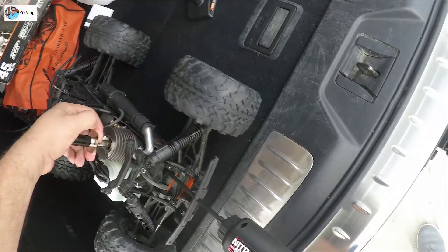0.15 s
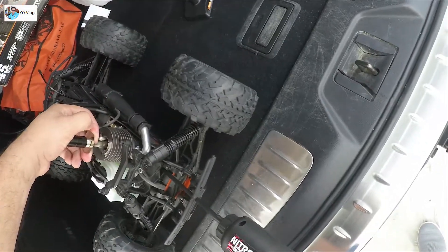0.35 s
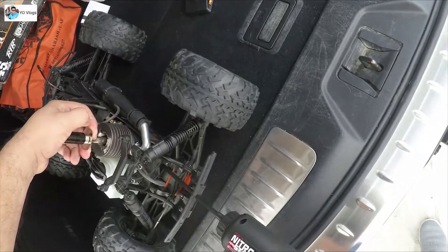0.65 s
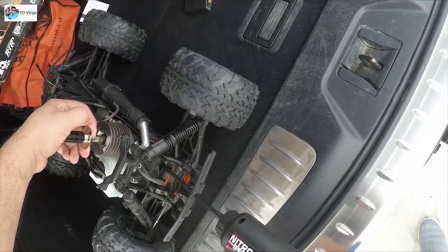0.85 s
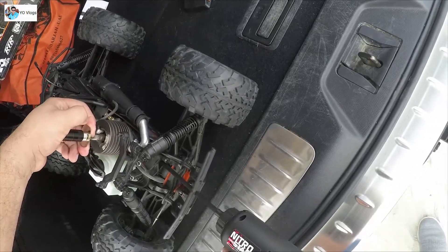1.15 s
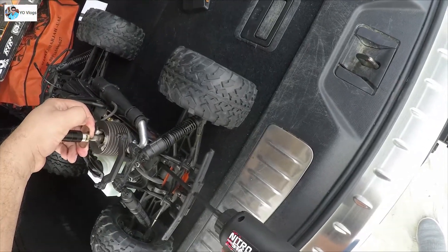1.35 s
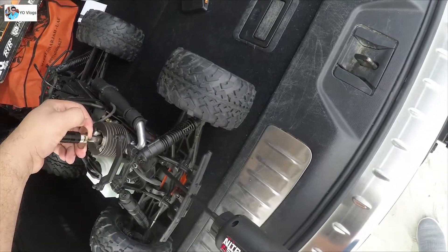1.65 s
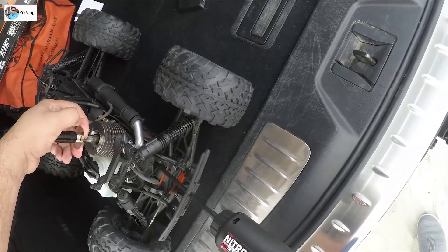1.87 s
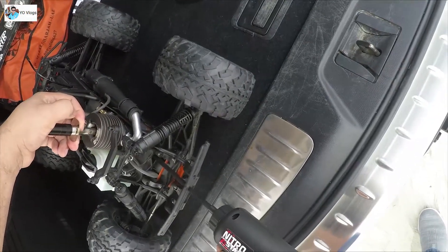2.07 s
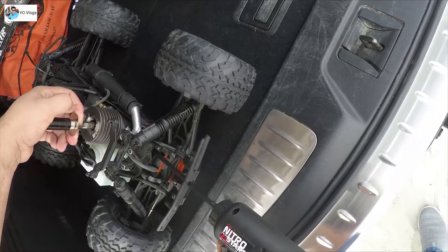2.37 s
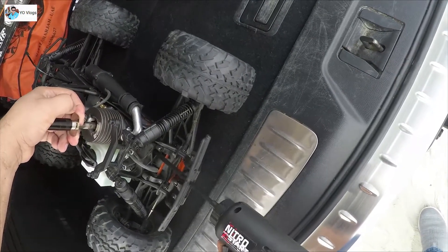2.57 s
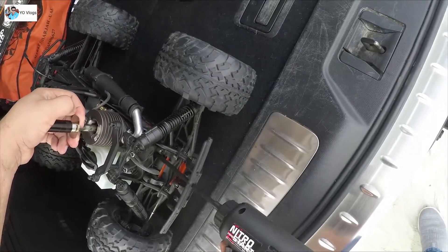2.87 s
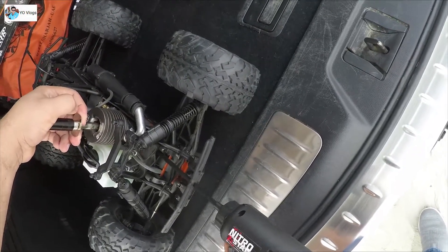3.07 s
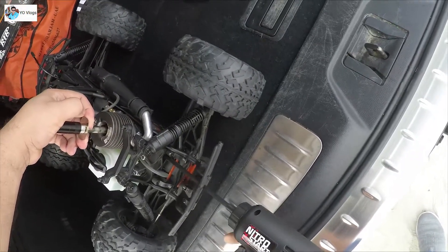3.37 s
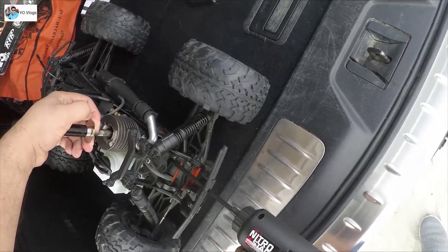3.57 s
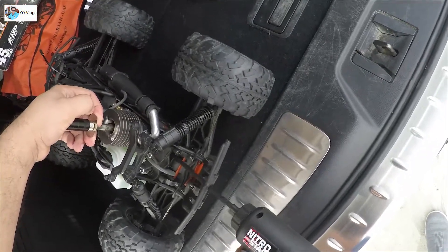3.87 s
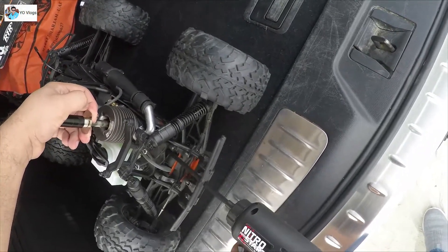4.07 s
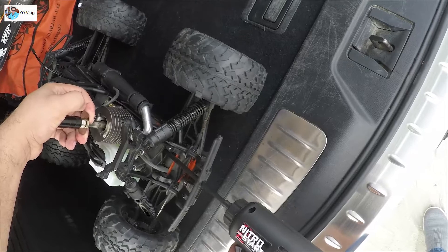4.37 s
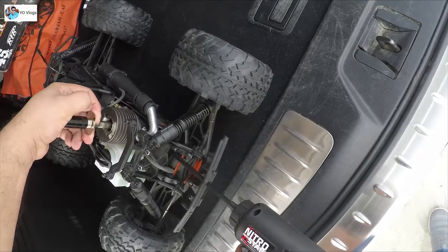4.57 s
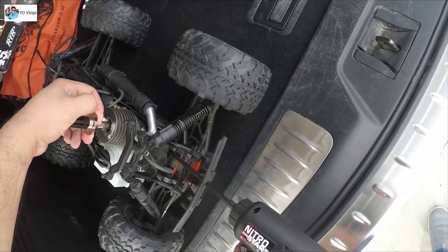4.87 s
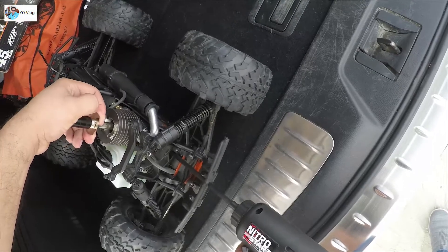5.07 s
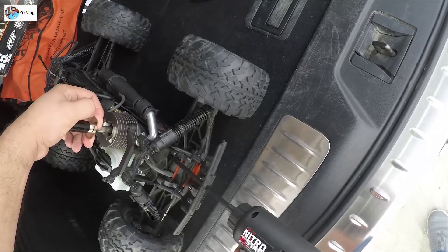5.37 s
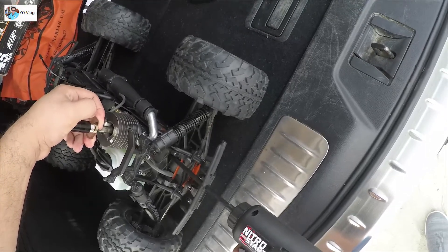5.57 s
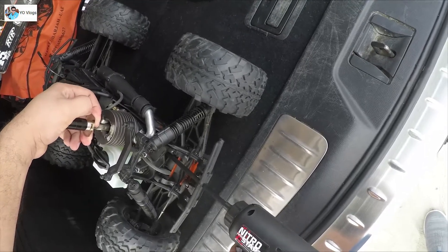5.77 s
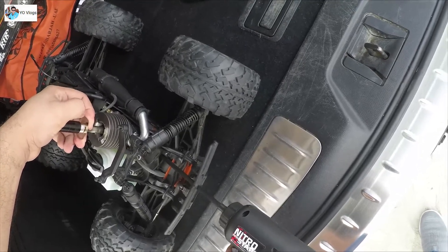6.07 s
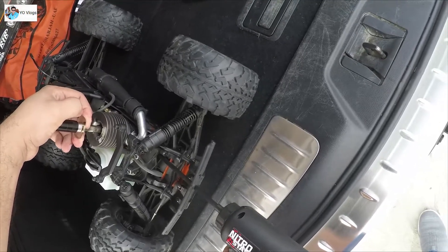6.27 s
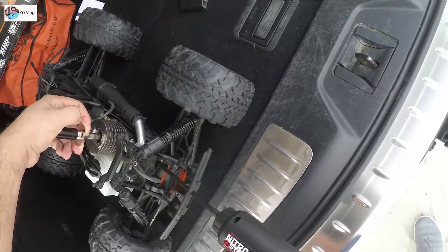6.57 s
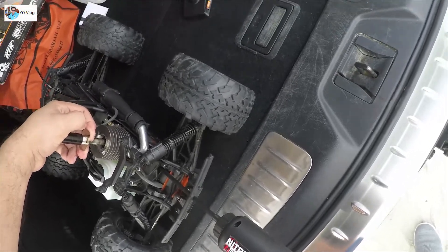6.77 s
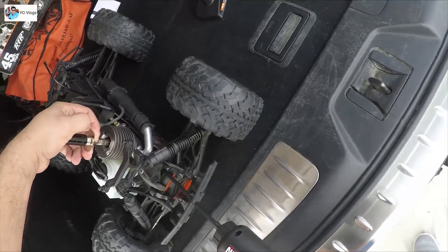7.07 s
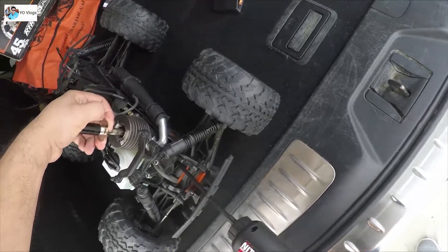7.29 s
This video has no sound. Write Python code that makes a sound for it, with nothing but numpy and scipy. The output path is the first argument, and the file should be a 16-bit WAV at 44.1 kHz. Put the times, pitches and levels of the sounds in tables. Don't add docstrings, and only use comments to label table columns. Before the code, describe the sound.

A hand-held electric starter cranks a small glow engine on a car boot floor, outdoors, heard very close. At 0 s a harsh clutch rasp bursts over gritty gear whir; weak barks follow, and from 0.33 to 0.5 s the engine sputters in a rapid ragged flutter, then dies with a hard metallic kick. From 0.8 to 3.3 s it labours unevenly: rasping skids, dull hollow pops, sharp clacks and occasional barks with rattling metal, roughly two lurches a second, quickening at times. The starter stops around 3.5 s, leaving light wind, faint ringing metal and a tiny bird chirp. At 3.75 s the whir jumps back, and until 5.3 s pop-clack pairs beat evenly, over six a second. From 5.4 s the clutch skids again about every quarter to half second, with a strong bark at 5.7 s. A short sputter and clank come at 7.2 s, then whir and a last pop near 7.4 s.

```python
import sys
import numpy as np
from scipy import signal
from scipy.fft import rfft, irfft, next_fast_len
from scipy.io import wavfile
from scipy.ndimage import uniform_filter1d

SR = 44100
rng = np.random.default_rng(int(sys.argv[2]) if len(sys.argv) > 2 else 0)


def pcm_store(signal):
    levels = np.round(np.clip(np.atleast_2d(signal), -1, 1) * 32767)
    wavfile.write(sys.argv[1], SR, levels.astype(np.int16).T)


def volts_from_db(level):
    exponent = np.asarray(level, float) / 20
    return 10 ** exponent


N = 327663

# pop_crest_s, clack_s, clack_db, groan_db, loudest_ring_hz
FREE_TURNS = [(3.8546, 3.8937, -10, -31, 4870), (4.0192, 4.054, -7.5, -27, 4870),
              (4.1766, 4.211, -7, -26.5, 4790), (4.3313, 4.366, -7, -31, 5020),
              (4.486, 4.52, -6, -31.5, 1664), (4.6404, 4.6748, -7.5, -29, 1680),
              (4.7957, 4.8308, -7, -29, 5330), (4.95, 4.9852, -6, -35, 5060),
              (5.1063, 5.1391, -6.5, -32, 1586), (5.2623, 5.295, -7, -29, 4950)]
# pop_crest_s, pop_db, clack_s, clack_db, loudest_ring_hz
LABOURED_TURNS = [(0.9445, -28, .9951, -16, 8350), (1.3746, -27, 1.423, -14, 4830),
                  (1.8139, -26, 1.8572, -12.5, 2130), (2.2399, -26, 2.2884, -12, 8160),
                  (2.496, -26.5, 2.55, -33, 5040), (2.9184, -26, 2.9649, -10.5, 8400),
                  (3.176, -25.5, 3.2443, -21, 8670), (5.5125, -25, 5.5555, -12, 7750),
                  (5.9393, -25, 5.9812, -13.5, 2390), (6.2035, -25, 6.2469, -12, 2100),
                  (6.4672, -25.5, 6.5057, -14, 1670), (6.7306, -24.5, 6.7672, -15, 3000),
                  (6.9954, -27, 7.016, -41.5, 4980), (7.3822, -28, 7.4121, -15, 1820)]
# bark_s, bark_db, pop_crest_lag_s, pop_db, groan_db
FIRED_TURNS = [(0.1364, -23, 0.0028, -28, -46), (0.3306, -17, 0.0026, -36, -40),
               (0.667, -21, 0.004, -30.5, -45), (1.1066, -13.5, 0.0026, -27, -41),
               (1.5362, -13.5, 0.0041, -25.5, -36), (1.972, -17, 0.004, -22, -30.5),
               (2.6554, -29.5, 0.003, -23.5, -33.5), (5.67, -11.5, 0.0034, -23.5, -38),
               (7.158, -16, 0.0022, -28, -32)]
# first_lag_s, first_db, second_lag_s, second_db
PIPE_RETURNS = [(0.011, -21, .020, -25), (0.027, -32, .03, -28.5), (0.0112, -29, .026, -26.5),
                (0.0095, -21.5, 0.023, -22.5), (.011, -20, .026, -20.5), (.0135, -23.5, 0.023, -22),
                (.015, -22.5, 0.023, -32.5), (.0105, -25, 0.0083, -17.5), (.0095, -20.5, .018, -22)]
# bark_s, peak_db
SPUTTERS = [(0.1473, -15.5), (0.3413, -17), (0.351, -11), (0.3687, -10.5), (0.395, -9.5), (0.4184, -14),
            (0.4373, -13), (0.4564, -11.5), (0.4845, -11.5), (0.5150, -17), (7.1706, -8), (7.1911, -10),
            (7.2125, -17)]
# time_s, level_db
BURNS = [
    [(.330, -25), (.40, -23.5), (.495, -23.5), (.515, -30)],
    [(7.159, -24), (7.2, -23), (7.235, -29)],
]
# freq_hz, density_db
BURN_TONE = [(120, -31.5), (220, -9.5), (270, -13.5), (340, -5), (470, -20), (610, -16.5), (870, -13.5),
             (1170, -24), (1400, -13.5), (1800, -15), (2600, -14.5), (5000, -23), (8500, -17.5),
             (13500, -28), (15200, -48)]
# freq_hz, level_db, t60_s
PIPE_MODES = [(339, -8.5, 0.07), (650, -9.5, 0.15), (1170, 13, 0.092), (1790, 7, 0.11)]
# freq_hz, level_db, t60_s
MUFFLER_MODES = [(163, -20, 0.15), (222, -0.5, 0.082), (238, -17, 0.048), (351, -6, 0.087),
                 (396, -10.5, 0.076), (612, -17.5, 0.2)]
# freq_hz, level_db, t60_s
SHELL_MODES = [(584, -3.5, 0.11), (629.7, 3, 0.085), (772, 1.5, 0.054)]
# freq_hz, level_db, t60_s
BARK_MODES = [(1180, 2, .04), (1800, 6, .03), (1450, 0, .03)]

# start_s, peak_db, length_s, groan_before_db
SLIPS = [(0.0271, 2.5, 0.01, -33), (0.827, -1.5, 0.019, -42), (1.266, 0, 0.017, -38.5),
         (1.6992, 1, 0.016, -34), (2.1242, 0, 0.019, -34.5), (2.3923, -2.5, 0.023, -36),
         (2.806, 1, 0.018, -30.5), (3.072, -1, 0.023, -44), (5.401, -1, 0.016, -34.5),
         (5.824, 1.5, 0.013, -40.5), (6.09, -1, 0.016, -38), (6.3532, 0, 0.015, -30.5),
         (6.6133, 0.5, 0.017, -46), (6.8902, 0, 0.012, -34)]
SLIP_THUD_DB = [4.8, 4.7, 4.1, 4, 8, 2.4, 4, 1.4, 5.9, 7, 5.3, 4.9, 6.3, 4.1]
HOUSING_DB = [2, 3.5, 0.5, 1, 5, -1, 3.5, 4, 1.5, 6.5, 2, 4, 5.5, 3]
# freq_hz, density_db
SLIP_TONE = [(88, -53.5), (150, -22), (624, -8), (888, -15), (1240, -0.5), (1900, -5.5), (2400, -2.5),
             (2920, -1), (3920, -7), (4860, -4), (6390, -5.5), (7040, -8), (11900, -13), (14800, -22.5),
             (16000, -40)]

# start_s, level_db, rebound_lag_s, rebound_db, rebound_ring_hz
KICKS = [(0.152, -3, 0.028, -11.5, 7980), (0.519, -2, .028, -14, 7760), (0.702, -10.5, 0.04, -13.5, 5000),
         (1.14, -4.5, .0391, -8.5, 8400), (1.5724, -5.5, 0.04, -8, 2130), (2.0106, -5, 0.042, -10.5, 1600),
         (2.6817, -4.5, .0465, -9, 3150), (5.703, -5.5, 0.038, -8.5, 1990), (7.215, -1.5, 0.028, -11, 5270)]
# ring_db, tilt_db_per_octave
KICK_SHAFT = [(-5.5, -1.5), (3, -1), (-1.5, -0.5), (-7, -2.5), (-5, -0.5), (-7, 0), (0.5, -1.5), (-11, -1),
              (-18.5, 0)]
# freq_hz, level_db, t60_s
KICK_MODES = [(2230, -11, 0.024), (3052, -11, 0.11), (3756, -3.5, 0.052), (5020, 0, 0.035),
              (6800, -27, 0.82), (7440, -1.5, 0.038), (8510, 6, 0.038), (9600, -3, .035),
              (9770, -1.5, 0.042), (11280, 6, 0.021), (12900, -15, 0.017)]
# start_s, level_db, loudest_ring_hz
STRAYS = [(0.2348, -18.5, 3000), (0.4566, -24, 8200), (0.591, -23, 8100), (0.8969, -14.5, 2660),
          (1.9206, -22, 1560), (2.087, -18.5, 3000), (2.3556, -20.5, 5370), (2.767, -16.5, 5190),
          (3.783, -35, 1790), (4.102, -16, 8400), (7.1148, -23, 2800), (7.1715, -12, 1790),
          (7.1916, -15, 1790)]
# freq_hz, density_db
CLACK_TONE = [(290, -15.5), (500, 9), (946, -9.5), (1950, 2.5), (4340, -3.5), (4940, 0), (7100, -8),
              (8450, -0.5), (13800, -14.5), (14700, -17.5), (16000, -45.5)]
# freq_hz, level_db, t60_s
CLACK_MODES = [(1700, -1.5, 0.041), (2130, -10.5, 0.047), (3035, -3.5, 0.05), (4870, -1.5, 0.038),
               (5190, -6, 0.05), (6800, -36, 0.73), (7980, -3, 0.074), (8450, 4, 0.019), (11330, -3, 0.036)]
# freq_hz, gain_db
SMALL_PARTS = [(500, -14), (1000, -3.5), (1400, -2), (9000, -0.5)]
# start_s, peak_db, low_body_db
RATTLES = [(0.1336, -19, 4), (0.6658, -19, 1.5), (0.6754, -18, 7.5), (1.1064, -16.5, 2),
           (1.1137, -11.5, 3.5), (1.215, -21, -8), (1.409, -31, -7), (1.5358, -13.5, 6), (1.5447, -10, 7),
           (1.9676, -16, 1), (1.9834, -14, 0.5), (2.175, -26, -9.5), (2.654, -14, 4), (3.03, -26, 0.5),
           (3.9525, -15, 2.5), (4.2652, -28, -2.5), (4.3074, -21, 9), (4.4198, -27, -5), (4.7293, -28.5, 3),
           (4.8857, -24.5, -7.5), (5.191, -31, -8.5), (5.346, -22, -5), (5.454, -33.5, -4),
           (5.6684, -15.5, -2.5), (5.6796, -10.5, 7.5), (5.803, -18, 4.5), (6.144, -28.5, -6.5),
           (6.837, -22.5, 1.5), (7.158, -14, 11), (7.391, -23, 9.5)]
# freq_hz, density_db
RATTLE_TONE = [(2500, 0), (6500, -6.5), (8400, 8.5), (9300, 4.5), (10000, -2.5), (11300, 1), (13000, -7),
               (16000, -30)]
# start_s, freq_hz, level_db, t60_s
PINS = [(0.182, 7980, -38, 0.22), (2.288, 3160, -33, .4), (2.682, 3094, -26.5, .4),
        (2.727, 3125, -31, 0.33), (2.767, 3030, -38.5, 0.24)]

# time_s, level_db, brightness_db
WHIR = [
    [(0.0, -24.5, -2.5), (0.13, -34, -2), (0.58, -38, -1.5), (0.84, -33.5, -1.5), (1.19, -29.5, -2.5),
     (1.91, -32, -2.5), (3.05, -32.5, -1), (3.4, -35, -8), (3.5, -47, -13.5)],
    [(3.732, -43.5, -4), (3.785, -22.5, -4.5), (3.88, -33, 0.5), (5.25, -33, 0.5), (5.4, -33, -0.5),
     (5.99, -35.5, -0.5), (7.09, -30.5, -2.5), (7.21, -43.5, 1), (7.43, -35, -3.5)],
]
# freq_hz, density_db
GEAR_TONE = [(88, -54), (150, -31.5), (235, -11), (398, -23.5), (662, -11), (905, -12), (1310, 1.5),
             (1980, -7), (5150, -9.5), (7180, -9.5), (8560, -7), (14500, -19.5), (16000, -30.5)]
# freq_hz, width_hz, level_db
GEAR_BODY = [(603, 92, -2), (1308, 13, -6.5), (1790, 30, 3.5), (2130, 33, -1), (3000, 1500, -5),
             (5080, 310, -2), (8400, 130, -4.5)]

# time_s, pitch_hz, level_db
CHIRPS = [
    [(3.57, 4550, -55), (3.581, 5600, -59), (3.592, 5650, -62), (3.606, 5300, -52), (3.62, 4600, -55)],
    [(3.62, 5540, -65), (3.632, 5900, -62), (3.645, 5570, -66)],
    [(3.657, 4600, -58), (3.666, 5300, -56), (3.676, 5550, -56), (3.70, 5500, -70.5)],
]
# time_s, pitch_hz, level_db
RINGS = [
    [(3.25, 5420, -52), (3.45, 5440, -58), (3.57, 5415, -64), (3.66, 5400, -66)],
    [(3.4, 2410, -66.5), (3.54, 2390, -67), (3.66, 2400, -70)],
    [(7.23, 6800, -33), (7.3, 6800, -53), (7.42, 6800, -57)],
]
# freq_hz, density_db
AIR_TONE = [(12, -28.5), (20, -2), (53, -7.5), (74, -3.5), (113, -10), (146, -14.5), (472, -36.5),
            (3950, -46.5), (5380, -47), (14300, -54.5), (16000, -81.5)]

# freq_hz, left_minus_right_db
PORT_DB = [(60, 22), (110, 18.5), (200, 19.5), (380, 11.5), (700, 6), (1290, -3), (2380, -4), (4400, -2),
           (8120, 1), (15000, 0)]
# freq_hz, left_lead_rad
PORT_TURN = [(0, -2.5), (260, -1.66), (950, -1.34), (3010, 0), (4650, 2), (5080, -2), (5770, 5),
             (6370, -2.5), (7490, 12), (8010, 6), (9470, 5.5), (11300, 7.5), (14500, 7.5), (15900, 18.5)]
# freq_hz, likeness_0_to_1
SAME = [(30, .3), (60, .5), (120, 0.87), (1000, 1), (2000, 0.95), (4000, 0.1), (12000, 0.52)]

CREST_S = .0056
FREE_POP_DB, FREE_KNOCK_DB, FREE_ECHO_S = -22.5, -17.5, .023
LABOURED_GROAN_DB, LABOURED_KNOCK_DB, LABOURED_ECHO_S = -58.5, -11, .027
FIRED_KNOCK_DB, FIRED_ECHO_S = -2, .035
PUSH_HZ, PUSH_S = 270, .0021
CHAMBER_HZ, CHAMBER_S, CHAMBER_DB = 352.7, .0073, -9
FIRED_BOOM_DB, RUN_BOOM_DB, FIRED_PITCH = -12, -13, .94
BURN_FLARE_DB, BURN_FLARE_S, PIPE_DB = 3, .008, -5.5
HARD_RING_DB, SOFT_RING_DB, CLACK_TILT_DB = .5, -.5, 1.5
KICK_HZ, KICK_T60_S, KNOCK_T60_S = 7980, .13, .047
RESTRIKE_S, RESTRIKE_DB, SOFT_RESTRIKE_DB = .0065, -9, -13.5
THUD_LAG_S, THUD_DB = .0097, -31.5
RATTLE_DB, RATTLE_BODY_DB, RATTLE_S = -2, 9.5, .013
SWITCH_S, OFF_DB, SWELL_DB = .003, -95, 1.5
GROAN_HZ, GROAN_LEAD_S, HUM_LEAD_S, HUM_DB = 1312, .029, .085, -13
WAVER, AIR_DB = .0012, -46.5


def evened(x):
    return x / np.sqrt(np.mean(x ** 2) + 1e-20)


def peaked(x):
    return x / abs(x).max()


def lumps(n, width):
    return evened(uniform_filter1d(rng.standard_normal(n), width))


def read(points, hz):
    f, value = np.transpose(points)
    return np.interp(np.log(hz + 1), np.log(f + 1), value)


def add(mix, s, sound):
    part = mix[round(s * SR):][:len(sound)]
    part += sound[:len(part)]


def colour(x, points, tilt_db=0):
    n = next_fast_len(x.shape[-1], True)
    hz = np.fft.rfftfreq(n, 1 / SR)
    gain_db = read(points, hz) + tilt_db * np.log2((hz + 50) / 4000)
    return irfft(rfft(x, n) * volts_from_db(gain_db), n)[..., :x.shape[-1]]


def ring(modes, t, spread_db=0, detune=0):
    hz, db, t60 = np.transpose(modes)[:, :, None]
    a, b = rng.standard_normal((2, len(modes), 1))
    decay = volts_from_db(db + spread_db * a - 60 * t / t60)
    return (decay * np.sin(2 * np.pi * hz * (1 + detune * b) * t)).sum(0)


def chirp(t, start_hz, end_hz, glide, rise):
    turns = end_hz * t + (start_hz - end_hz) * glide * (1 - np.exp(-t / glide))
    return (t / rise) ** 2 * np.exp(2 - 2 * t / rise) * np.sin(2 * np.pi * turns)


def pops():
    free = [(s - CREST_S, FREE_POP_DB, groan_db, FREE_KNOCK_DB, FREE_ECHO_S)
            for s, _, _, groan_db, _ in FREE_TURNS]
    laboured = [(s - CREST_S, db, LABOURED_GROAN_DB, LABOURED_KNOCK_DB, LABOURED_ECHO_S)
                for s, db, *_ in LABOURED_TURNS]
    fired = [(s + lag - CREST_S, db, groan_db, FIRED_KNOCK_DB, FIRED_ECHO_S)
             for s, _, lag, db, groan_db in FIRED_TURNS]
    return free + laboured + fired


def exhaust_puffs():
    out, t = np.zeros(N), np.arange(6000) / SR
    crest = t - .0052
    push = np.exp(-((crest - .0008) / PUSH_S) ** 2) * np.cos(2 * np.pi * PUSH_HZ * crest)
    chamber = np.exp(-((crest - .0033) / CHAMBER_S) ** 4) * np.cos(2 * np.pi * CHAMBER_HZ * crest)
    gas = volts_from_db(-4) * push + volts_from_db(CHAMBER_DB) * chamber + volts_from_db(-13.5) * chirp(t, 2415, 736, .00189, .0034)
    for s, db, _, knock_db, echo_s in pops():
        muffler = ring(MUFFLER_MODES, t, 1, .008) * (1 - np.exp(-(t / .0014) ** 2))
        shell = ring(SHELL_MODES, t, .7, .051) * (1 - np.exp(-(t / .004) ** 2))
        puff = gas + volts_from_db(-7.5) * muffler + volts_from_db(knock_db) * shell
        add(out, s, volts_from_db(db + 6) * puff)
        add(out, s + echo_s, volts_from_db(db - 4) * puff)
        add(out, s + 1.72 * echo_s, volts_from_db(db - 11.5) * chirp(t, 300, 195, .003, .0063))
    return out


def bark(t, pitch, boom_db):
    sweep = chirp(t, 2200 * pitch, 1650 * pitch, .002, .0012) - .18 * chirp(t, 1450, 1100, .002, .0013)
    echoes = np.zeros(len(t))
    for gain, hz, lag_s in [(.6, 1900, .0031), (.35, 1350, .0042), (.2, 1150, .008)]:
        start_hz = hz * pitch ** 2 * rng.uniform(.98, 1.02)
        echo = chirp(t, start_hz, .8 * hz * pitch ** 2, .003, .0012 / pitch ** 3)
        echoes += gain * np.roll(echo, int(lag_s * rng.uniform(.96, 1.04) * SR))
    pipe = ring(BARK_MODES, t, .78, .016) * (1 - np.exp(-t / .0032))
    shell = ring(SHELL_MODES, t, 1.7, .0052) * (1 - np.exp(-(t / .006) ** 2))
    boom = chirp(t, 930, 604, .003, .0092) + volts_from_db(-18) * shell
    return pitch ** 2 * sweep + echoes / pitch + volts_from_db(-6) * pipe + volts_from_db(boom_db) * boom


def firings():
    out, t = np.zeros(N), np.arange(6000) / SR
    for (s, db, *_), (first_s, first_db, second_s, second_db) in zip(FIRED_TURNS, PIPE_RETURNS):
        add(out, s, volts_from_db(db + 2) * bark(t, FIRED_PITCH, FIRED_BOOM_DB))
        add(out, s + first_s, volts_from_db(first_db) * chirp(t, 422, 282, .0033, .0048))
        add(out, s + second_s, volts_from_db(second_db) * chirp(t, 430, 350, .0048, .0072))
    for s, db in SPUTTERS:
        add(out, s, volts_from_db(db + 2) * bark(t, 1, RUN_BOOM_DB))
    return out


def burning():
    out = np.zeros(N)
    for rows in BURNS:
        s, db = np.transpose(rows)
        t = np.arange(s[0], s[-1], 1 / SR)
        crackle = rng.standard_normal(len(t)) * volts_from_db(2 * lumps(len(t), 150))
        sung = signal.oaconvolve(crackle, ring(PIPE_MODES, t - s[0]))[:len(t)]
        since_s = t[:, None] - [row[0] for row in FIRED_TURNS + SPUTTERS]
        flare = np.exp(-np.where(since_s > 0, since_s, 1).min(1) / BURN_FLARE_S)
        burn = evened(evened(colour(crackle, BURN_TONE)) + volts_from_db(PIPE_DB) * evened(sung))
        add(out, s[0], volts_from_db(np.interp(t, s, db) + BURN_FLARE_DB * flare) * burn)
    return out


def slips():
    out, t = np.zeros((2, N)), np.arange(8192) / SR
    for (s, db, length_s, _), thud_db, housing_db in zip(SLIPS, SLIP_THUD_DB, HOUSING_DB):
        grabs = volts_from_db(1.36 * lumps(len(t), 50))
        decay = np.exp(-(t / length_s) ** 1.35 * 1.62) + .083 * np.exp(-t / .016)
        shape = (1 - np.exp(-(t / .008) ** 2)) * decay
        for port in out:
            rasp = colour(rng.standard_normal(len(t)) * grabs, SLIP_TONE)
            rasp = colour(rasp, [(2200, .0049), (2900, housing_db), (3700, .008)]) * shape
            treble = colour(rasp, SMALL_PARTS)
            peak = abs(rasp).max()
            add(port, s - .002, volts_from_db(db + 1) * treble / peak)
            add(port, s + .006, volts_from_db(db + thud_db - 4) * (rasp - treble) / peak)
        add(out[0], s + THUD_LAG_S, volts_from_db(db + thud_db + THUD_DB) * chirp(t, 754, 222, .0018, .0041))
    return out


def knocks():
    def parts(hz):
        return CLACK_MODES + [(hz, 1, KNOCK_T60_S)]
    hard = [(s, db, HARD_RING_DB, parts(hz), 0) for _, s, db, _, hz in FREE_TURNS]
    hard += [(s, db, HARD_RING_DB, parts(hz), 0) for _, _, s, db, hz in LABOURED_TURNS]
    for (s, db, *_), (shaft_db, tilt_db) in zip(KICKS, KICK_SHAFT):
        hard.append((s, db, HARD_RING_DB, KICK_MODES + [(KICK_HZ, shaft_db, KICK_T60_S)], tilt_db))
    soft = [(s + lag, db, SOFT_RING_DB, parts(hz), 0) for s, _, lag, db, hz in KICKS]
    soft += [(s, db, SOFT_RING_DB, parts(hz), 0) for s, db, hz in STRAYS]
    return hard + soft


def clacks():
    out, t = np.zeros((2, N)), np.arange(8192) / SR
    for s, db, ring_db, modes, tilt_db in knocks():
        rebound = 1 + .77 * np.exp(-((t - rng.uniform(.0064, .0067)) / .0027) ** 2)
        decay = np.exp(-t / .0024) + .24 * np.exp(-t / .02)
        shape = (1 - np.exp(-t / .00022)) * decay * rebound
        restrike_db = RESTRIKE_DB if modes[-1][0] == KICK_HZ else SOFT_RESTRIKE_DB
        for port in out:
            crack = colour(rng.standard_normal(len(t)), CLACK_TONE, CLACK_TILT_DB) * shape
            blow = rng.standard_normal(90) * np.exp(-np.arange(90) / 18)
            gap = np.zeros(int(RESTRIKE_S * SR * rng.uniform(.6, 1)))
            strike = np.concatenate([blow, gap, volts_from_db(restrike_db) * blow[::-1]])
            metal = peaked(signal.oaconvolve(ring(modes, t, 1.5, .002), strike)[:len(t)])
            clack = colour(peaked(crack) + volts_from_db(ring_db) * metal, SMALL_PARTS, tilt_db)
            add(port, s - .0005, volts_from_db(db + 2) * clack)
    return out


def rattles():
    out, t = np.zeros((2, N)), np.arange(2048) / SR
    shape = (1 - np.exp(-t / .00057)) * np.exp(-(t / RATTLE_S) ** 1.05)
    for s, db, body_db in RATTLES:
        low_db = body_db + RATTLE_BODY_DB
        tone = [(1000, low_db - 11.5), (1500, low_db)] + RATTLE_TONE[1:]
        for port in out:
            buzz = colour(rng.standard_normal(len(t)), tone)
            add(port, s - .0008, volts_from_db(db + RATTLE_DB) * peaked(buzz * shape))
    return out


def pins():
    out, t = np.zeros(N), np.arange(12000) / SR
    for s, *mode in PINS:
        add(out, s, ring([mode], t) * (1 - np.exp(-t / .0023)))
    return out


def starter():
    t = np.arange(N) / SR
    off = [(WHIR[0][-1][0] + SWITCH_S, OFF_DB, 0), (WHIR[1][0][0] - SWITCH_S, OFF_DB, 0)]
    rows = np.concatenate([WHIR[0], off, WHIR[1]])
    level_db, bright_db = (np.interp(t, rows[:, 0], column) for column in rows.T[1:])
    releases_s = np.sort([row[0] for row in pops() + SLIPS])
    turn = np.interp(t, releases_s, np.arange(len(releases_s)))
    load = np.cos(2 * np.pi * (turn - .72)) + .72 * np.cos(4 * np.pi * (turn - .3))
    teeth = volts_from_db(2 * rng.exponential(1, N)) * (rng.random(N) < 2500 / SR)
    knocking = evened(teeth) * rng.choice([-1., 1.], (2, N))
    brushes = 2.7 * rng.standard_normal((2, N))
    drive = (knocking + brushes) * volts_from_db(1.27 * lumps(N, 300))
    hz = np.fft.rfftfreq(N, 1 / SR)
    body = 1 + sum(3.24 * volts_from_db(db) / (1 + 2j * (hz - f) / w) for f, w, db in GEAR_BODY)
    whir = evened(irfft(rfft(colour(drive, GEAR_TONE)) * body, N))
    hz, frame_s, z = signal.stft(whir, SR, nperseg=256)
    noise = rng.standard_normal(z.shape[:0:-1])
    patches = evened(uniform_filter1d(uniform_filter1d(noise, 7, 0), 4, 1)).T
    high = hz[:, None] ** 4 / (hz[:, None] ** 4 + 3600. ** 4)
    trim_db = read([(900, -.11), (1200, -.39)], hz)[:, None]
    z = z * volts_from_db(2.47 * patches + trim_db + (high + 1.5) * np.interp(frame_s, t, bright_db))
    return evened(signal.istft(z, SR, nperseg=256)[1][:, :N]) * volts_from_db(level_db + SWELL_DB * load)


def groans():
    out, t = np.zeros(N), np.arange(2000) / SR
    loads = [(s, GROAN_LEAD_S, db, GROAN_HZ) for s, _, db, *_ in pops()]
    loads += [(s, HUM_LEAD_S, db + HUM_DB, GROAN_HZ * .98) for s, _, _, db, _ in FREE_TURNS]
    loads += [(s, .024, db, 1380) for s, _, _, db in SLIPS[1:]]
    steps = np.arange(len(t))
    rising = steps * (.98 + .065 * t / t[-1])
    for s, lead_s, db, hz in loads:
        modes = [(hz, 0, .09), (hz * 1.35, -4, .06), (hz * 1.7, -9, .04), (hz * .93, -8, .05)]
        sing = signal.oaconvolve(rng.standard_normal(len(t)), ring(modes, t, 2.8))[:len(t)]
        sing = np.interp(rising, steps, sing)
        add(out, s - lead_s - .017, volts_from_db(db) * evened(sing) * np.hanning(len(t)))
    return out


def whistles():
    out = np.zeros(N)
    for rows in CHIRPS + RINGS:
        s, hz, db = np.transpose(rows)
        t = np.arange(s[0], s[-1], 1 / SR)
        pitch_hz = np.interp(t, s, hz) * (1 + WAVER * lumps(len(t), 60))
        tone = np.sin(2 * np.pi * np.cumsum(pitch_hz) / SR) * signal.windows.tukey(len(t), .2)
        add(out, s[0], volts_from_db(np.interp(t, s, db) - 5.5) * tone)
    return out


def air():
    gusts = volts_from_db(lumps(N, 5000))
    return volts_from_db(AIR_DB) * evened(colour(rng.standard_normal((2, N)), AIR_TONE) * gusts)


def scene():
    near = exhaust_puffs() + firings() + burning() + groans() + whistles() + pins()
    twin = np.roll(near, 40) + .3 * np.roll(near, 410)
    return np.array([near, twin / 2]) + slips() + clacks() + rattles() + starter() + air()


def roll_off(x):
    return signal.sosfilt(signal.butter(12, 16370, fs=SR, output="sos"), x)


def record(dry):
    hz = np.fft.rfftfreq(N, 1 / SR)
    direct, twin = rfft(dry)
    same = np.clip(read(SAME, hz), 0, 1)
    port = volts_from_db(read(PORT_DB, hz) / 2) * np.exp(.5j * read(PORT_TURN, hz))
    middle = np.sqrt(abs(port) ** 2 + abs(port) ** -2. + 2 * same * np.cos(2 * np.angle(port))) / 2
    left = direct * port
    right = (same * direct + np.sqrt(1 - same ** 2) * twin) / port
    pair = irfft(np.array([left, right]) / middle, N)
    limited = 1.281 * np.tanh(pair / 1.228)
    mix = signal.oaconvolve(limited, signal.firwin(255, 16300, fs=SR)[None], "same")
    return roll_off(mix)


dry = scene()
out = record(dry)
pcm_store(out)
```